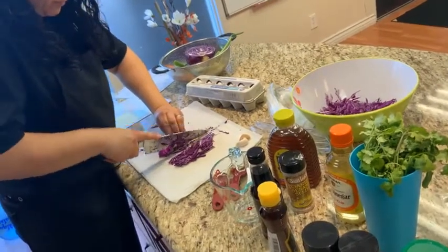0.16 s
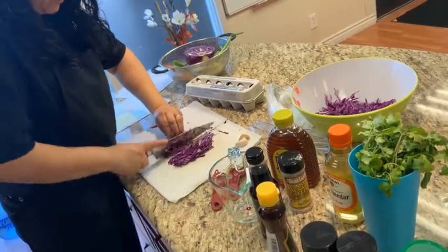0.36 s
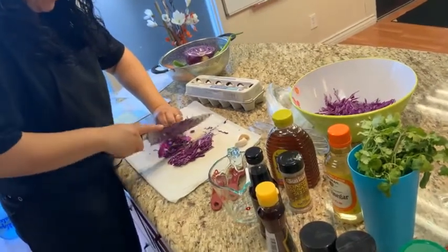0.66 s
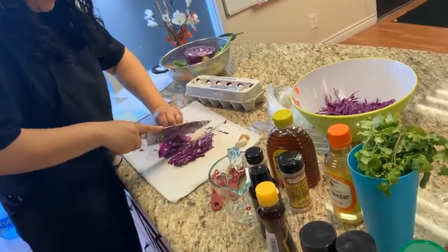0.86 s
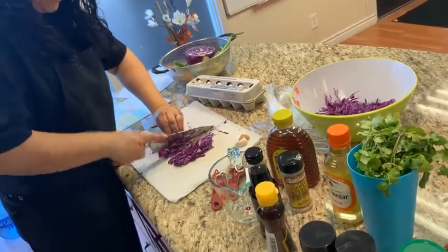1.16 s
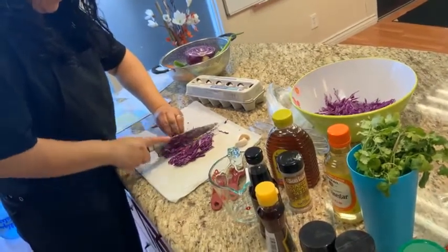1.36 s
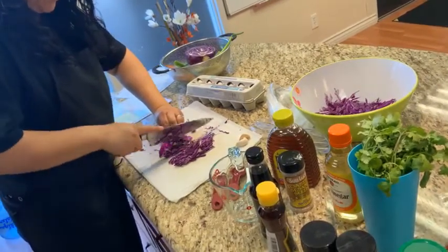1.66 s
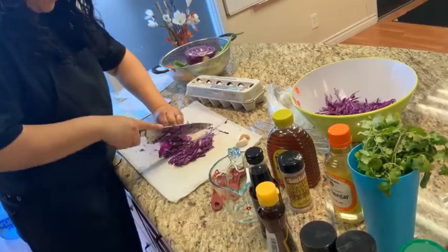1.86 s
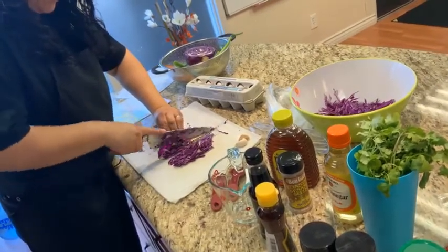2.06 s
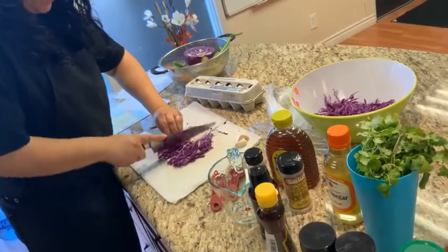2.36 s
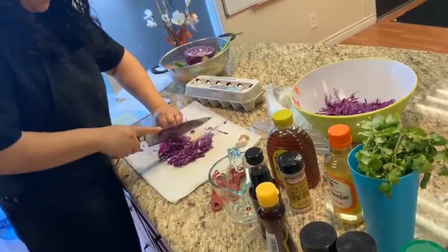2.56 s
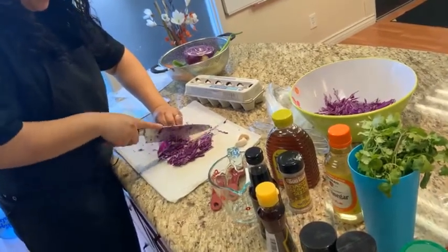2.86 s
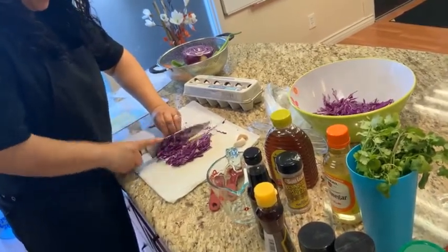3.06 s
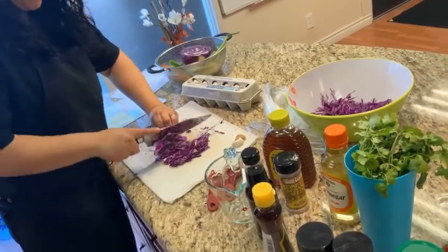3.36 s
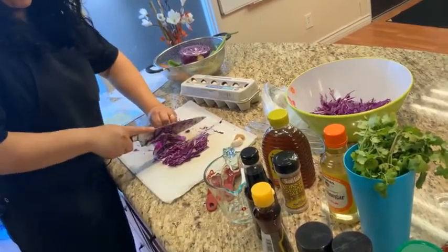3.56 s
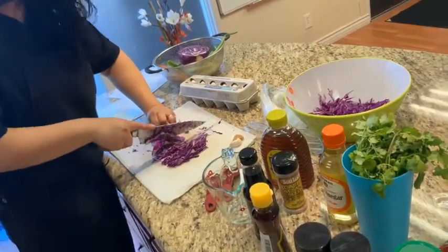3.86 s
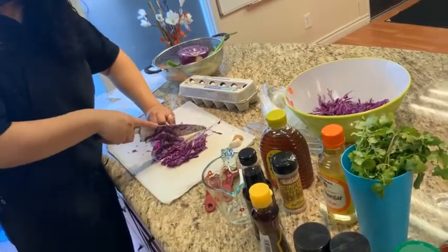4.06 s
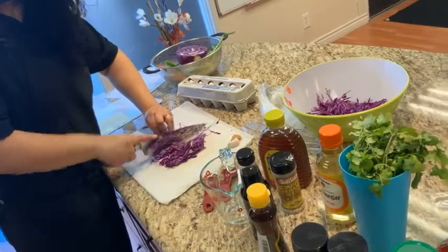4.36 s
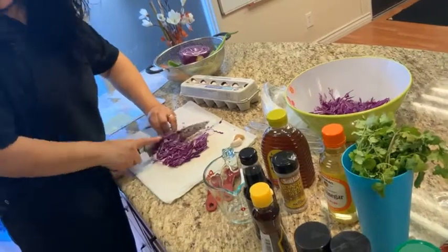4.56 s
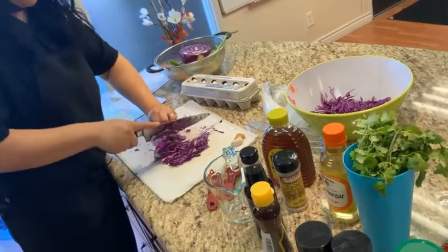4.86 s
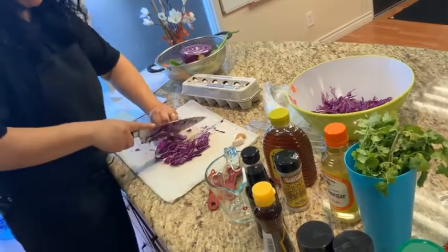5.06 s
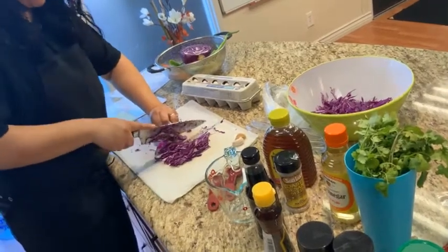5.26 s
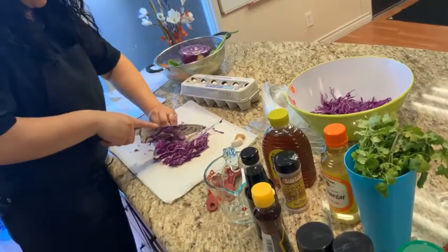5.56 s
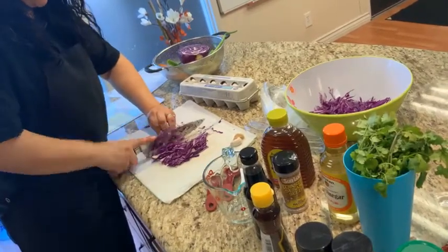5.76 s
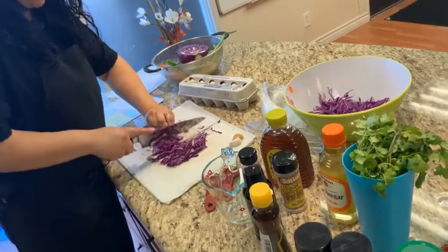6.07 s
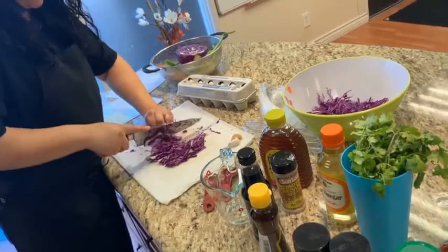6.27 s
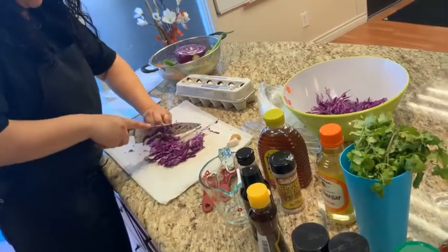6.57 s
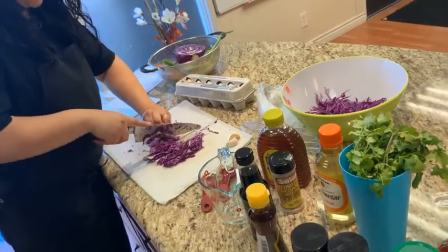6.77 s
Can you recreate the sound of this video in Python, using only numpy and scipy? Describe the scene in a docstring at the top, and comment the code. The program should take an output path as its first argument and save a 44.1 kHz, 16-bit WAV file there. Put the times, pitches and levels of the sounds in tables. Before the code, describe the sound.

A knife slices cabbage on a plastic board in six crisp, crunching strokes with light knocks, over a low appliance hum.

```python
"""A crisp crunch comes first: a chef's knife shreds red cabbage on a plastic board, about a metre away.
In each of six strokes the tip slips through the outer leaves and meets the board, then the heel crushes
the packed layers in a swarm of tiny fractures. Leaves snap, the board knocks, the steel ticks and scuffs.
Shreds rustle between strokes, and an appliance hums in the small, reverberant kitchen."""
import sys
import numpy as np
from scipy import signal
from scipy.fft import rfft, irfft
from scipy.io import wavfile
from scipy.ndimage import uniform_filter1d

SR = 44100
rng = np.random.default_rng(int(sys.argv[2]) if len(sys.argv) > 2 else 0)


def bounce(signal):
    """Save signal as a 16-bit WAV file at the path given by the first command-line argument."""
    frames = np.transpose(np.atleast_2d(signal))
    limited = np.clip(frames, -1, 1)
    pcm = np.round(limited * 32767).astype(np.int16)
    wavfile.write(sys.argv[1], SR, pcm)


N = 305172
TIME = np.arange(N) / SR

# Knife strokes. Each row: start, tip rise and tip hold in seconds, relative tip and glide levels in dB,
# heel delay, rise and hold in seconds, relative heel level in dB, ribs against cells in dB.
KNIFE_STROKES = [(0.025, 0.0025, 0.087, -50, -60, 0.22, 0.086, 0.028, -49, -0.5),
                 (1.024, 0.0025, 0.045, -49, -54.5, 0.17, 0.067, 0.048, -46.5, -2),
                 (1.959, 0.018, 0.017, -46.5, -60, 0.15, 0.038, 0.078, -46, -3.5),
                 (2.883, 0.0059, 0.043, -48.5, -51.5, .135, .045, 0.065, -45, -3),
                 (4.126, .004, 0.016, -51.5, -57.5, .232, 0.092, 0.063, -45, -4.5),
                 (5.558, 0.0088, 0.048, -53, -64, 0.15, 0.028, 0.074, -43, -6)]
# Leaves snapping. Each row: start in seconds, level in dB, low body against the crack in dB.
LEAF_SNAPS = [(0.018, -46.5, -10), (.046, -42.5, -11), (.084, -42, -9), (.173, -43, 2), (.243, -39.5, -20),
              (.731, -50.5, -12), (0.786, -57.5, -16), (.85, -57.5, -20), (1.021, -48, -22),
              (1.055, -40, -15), (1.163, -40, -5), (1.219, -40.5, -5), (1.768, -57, -22),
              (1.974, -38.5, -4), (2.028, -45, -12), (2.103, -43, -4.5), (2.886, -52, -16),
              (3.002, -40.5, -5.5), (3.03, -41, -18), (3.509, -59, -19), (4.126, -52, -25),
              (4.281, -43, -4.5), (4.324, -37, -6), (4.339, -38, -9), (4.412, -46, -3), (5.559, -44.5, -12),
              (5.607, -53, -22), (5.712, -37.5, -22), (6.523, -57, -19), (6.594, -58.5, -16),
              (6.8, -61, -5)]
# Knocks of the edge on the board, and dry taps of the blade. Each row: start in seconds, level in dB.
BOARD_KNOCKS = [(.110, -45), (.266, -47.5), (.375, -50.5), (1.057, -41), (1.239, -50.5), (1.977, -41),
                (2.186, -53), (2.931, -44.5), (3.075, -56), (4.139, -45.5), (5.562, -49), (5.796, -49)]
BLADE_TICKS = [(1.863, -48.5), (3.995, -48), (4.023, -40.5), (4.03, -49), (5.681, -38.5)]
# The edge drawn back over the board, and shreds shifting under the fingers and the lifted blade.
# Each row: time of the peak in seconds, relative level in dB, half width in seconds.
EDGE_SCUFFS = [(4.053, -59, .008), (4.675, -62, 0.021), (5.995, -62, 0.0091)]
SHRED_RUSTLES = [(0.37, -67.5, 0.044), (0.934, -64.5, 0.1), (1.652, -65, .01), (1.875, -64.5, 0.06),
                 (2.586, -61, 0.0075), (2.797, -62.5, 0.048), (3.514, -63.5, 0.012), (3.79, -74, 0.079),
                 (4.016, -60, 0.045), (4.665, -72, 0.072), (5.421, -54, 0.021), (5.534, -60.5, 0.065),
                 (5.967, -66, 0.029), (6.227, -67, .017), (6.533, -61, 0.024), (6.61, -70, 0.093)]
# Modes of the board. Each row: frequency in Hz, relative level in dB, time to fall 60 dB in seconds.
BOARD_RESONANCES = [(730, -12, 0.025), (1015, -5.5, 0.02), (1264, -3.5, 0.022), (1543, 0, 0.021),
                    (1770, -1.5, 0.0082), (1980, 1, 0.012), (2170, -11, 0.024), (2780, 0, 0.016),
                    (3500, -4, 0.0088)]
# Spectra of bursting cells, tearing ribs, the steel blade, loose shreds, fan rumble and rushing air.
# Each row: frequency in Hz, spectral level in dB.
CELL_SPECTRUM = [(1500, -16.5), (4000, -5), (6300, -4.5), (8000, 2.5), (9600, 5), (10600, 3), (11800, 5),
                 (13600, 5), (15300, 9), (16500, 0.5)]
RIB_SPECTRUM = [(120, -27), (330, 5.5), (800, -1), (1300, 1), (1700, 2.5), (2300, -0.5), (3500, 1),
                (5000, 0.5), (6800, 0.5), (9000, -3), (16000, -6.5)]
BLADE_SPECTRUM = [(1500, -34), (2900, -8.5), (4200, -20), (5700, -11), (6600, 0), (8300, -4), (9900, 4.5),
                  (11000, -1), (12500, -9), (14700, 3), (16000, -24)]
SHRED_SPECTRUM = [(500, -1), (2000, -12.5), (4500, -11.5), (6500, -8.5), (8000, -3.5), (9500, 0),
                  (10700, -3.5), (13500, -2), (15200, 0), (16500, 0)]
RUMBLE_SPECTRUM = [(20, -96), (36, -89.5), (55, -70.5), (80, -66), (100, -70), (125, -66.5), (165, -76.5),
                   (200, -80.5), (270, -81), (370, -84.5), (540, -85), (660, -92.5), (1100, -96),
                   (1600, -103)]
AIR_SPECTRUM = [(1600, -103), (2400, -105), (4000, -110), (5100, -113), (5750, -109), (6200, -114),
                (6800, -119), (8300, -122), (9400, -119), (11000, -122), (16000, -120)]
# Motor tones of the appliance. Each row: frequency in Hz, rms level in dB, rms wander in Hz.
MOTOR_TONES = [(78.8, -53.5, 3.93), (96, -51, 2.028), (233.2, -62, 2.55), (416.7, -73, 3.13),
               (493, -68, 1.45), (828, -77.5, 2.97), (956, -77.5, 1.92), (1198, -84.5, 1.88),
               (1316, -72, 1.18), (1803, -84, 2.14), (2440, -84.5, 3.2), (2805, -86.5, 3.2),
               (3400, -85, 3.05), (5680, -103, 30), (5850, -84, 28)]
# Echoes off hard surfaces, counter first. Each row: delay in seconds, level against direct sound in dB.
EARLY_ECHOES = [(.0021, -11.5), (.0039, -19), (.0072, -12.5)]


def slicing(cell_db=0.7, rib_db=0.56, layer_db=0.27, lean_db_per_s=18):
    """Fracture noise follows the cutting force: cells burst, ribs tear, resistance varies by layer."""
    skin_db, skin_s = -8, 0.023  # the thin outer leaves have few ribs
    squeeze_db, squeeze_s = 2, 0.022  # the last layers are crushed against the board
    fizz, crunch = np.zeros(N), np.zeros(N)
    for (start, tip_rise, tip_hold, tip_db, glide_db,
         heel_delay, heel_rise, heel_hold, heel_db, balance_db) in KNIFE_STROKES:
        t = TIME - start
        heel_t = t - heel_delay
        tip = undb(tip_db) * pressure(t, tip_rise, tip_hold)
        glide = undb(glide_db) * pressure(t, tip_rise, heel_delay)
        lean_db = lean_db_per_s * (np.clip(heel_t, 0, heel_hold) - heel_hold / 2)  # the hand bears down
        heel = undb(heel_db + lean_db) * pressure(heel_t, heel_rise, heel_hold) * (t > 0)
        effort = np.maximum(np.maximum(tip, glide), heel)
        entry_db = skin_db * np.exp(-np.maximum(t, 0) / skin_s)
        exit_db = squeeze_db * np.exp(np.minimum(heel_t - heel_hold, 0) / squeeze_s)
        fizz += effort
        crunch += effort * undb(balance_db + entry_db + exit_db)
    layers = unit_rms(undb(layer_db * drift(170)))
    cells = colour(fractures(N, per_second=7600, spread_db=4), CELL_SPECTRUM)
    ribs = colour(fractures(N, per_second=2600, spread_db=3), RIB_SPECTRUM)
    return layers * (undb(cell_db) * fizz * cells + undb(rib_db) * crunch * ribs)


def pressure(t, rise_s, hold_s, release_s=0.014):
    """Force on the edge grows exponentially until t = 0, holds, and relaxes once the edge is through."""
    return np.exp(np.minimum(t, 0) / rise_s - np.maximum(t - hold_s, 0) / release_s)


def snapping(rise_s=0.0003, fade_s=0.0036):
    """Crack propagation: an avalanche of fractures crosses a leaf and dies within milliseconds."""
    out, t = np.zeros(N), TIME[:SR // 16]
    envelope = (1 - np.exp(-t / rise_s)) * np.exp(-t / fade_s)
    for start, db, body_db in LEAF_SNAPS:
        crack = envelope * fractures(len(t), per_second=9000, spread_db=2.5)
        snap = colour(crack, CELL_SPECTRUM) + undb(body_db) * colour(crack, RIB_SPECTRUM)
        add(out, start, at_level(snap, db))
    return out


def knocking(cushion_hz=2500):
    """Impact excites the board's modes; leaves under the edge cushion the blow, a low-pass filter."""
    out = np.zeros(N)
    cushion = signal.butter(3, cushion_hz, fs=SR, output="sos")
    for start, db in BOARD_KNOCKS:
        strike = impact(chatter=0.025, fade_s=0.01)
        knock = signal.fftconvolve(strike, board_response(scatter_db=0, detune=0.058))
        add(out, start, at_level(signal.sosfilt(cushion, knock), db))
    return out


def ticking():
    """Damping by the hand cuts the steel's bright resonances short, leaving a dry tick."""
    out = np.zeros(N)
    for start, db in BLADE_TICKS:
        tick = colour(impact(chatter=0.11, fade_s=0.0042), BLADE_SPECTRUM)
        add(out, start, at_level(tick, db))
    return out


def impact(chatter, fade_s):
    """A hard contact is an impulse followed by decaying chatter."""
    t = TIME[:SR // 25]
    return (t == 0) + chatter * rng.standard_normal(len(t)) * np.exp(-t / fade_s)


def board_response(scatter_db, detune):
    """Free vibration is a sum of damped modes, here scattered at random in level and frequency."""
    t = TIME[:SR // 8]
    out = np.zeros(len(t))
    for hz, db, t60 in BOARD_RESONANCES:
        weakening, mistuning = rng.standard_normal(2)
        mode = np.cos(2 * np.pi * hz * (1 + detune * mistuning) * t)
        out += undb(db - scatter_db * weakening) * mode * decay(t, t60)
    return out


def scuffing():
    """Stick-slip friction: tiny slips of the edge drive the board's modes."""
    slips = fractures(N, per_second=2000, spread_db=5)
    scrape = signal.fftconvolve(slips, board_response(scatter_db=3, detune=0.04))[:N]
    return swells(EDGE_SCUFFS) * unit_rms(scrape)


def rustling(swell_db=0.5, resting_db=-86, fidget_db=4):
    """Friction between wet shreds makes a fine crackle; the holding hand is never quite still."""
    motion = undb(swell_db) * swells(SHRED_RUSTLES) + undb(resting_db + fidget_db * drift(7))
    return motion * colour(fractures(N, per_second=1600, spread_db=3), SHRED_SPECTRUM)


def kitchen(x, tail_db=-12.5, low_t60_s=0.61, treble_t60_s=0.36, split_hz=6000, build_s=0.0018):
    """Reverberation: early reflections lead into a diffuse tail whose treble is absorbed first."""
    t = TIME[:SR * 3 // 5]
    noise = rng.standard_normal(len(t))
    low = signal.sosfilt(signal.butter(2, split_hz, fs=SR, output="sos"), noise)
    treble = signal.sosfilt(signal.butter(2, split_hz, "high", fs=SR, output="sos"), noise)
    tail = low * decay(t, low_t60_s) - treble * decay(t, treble_t60_s)
    tail *= 1 - np.exp(-t / build_s)
    response = undb(tail_db) * unit_energy(tail)
    response[0] += 1  # direct sound
    for delay, db in EARLY_ECHOES:
        smear = rng.standard_normal(48) * np.hanning(48)  # clutter scatters each echo
        add(response, delay, undb(db) * unit_energy(smear))
    return signal.fftconvolve(x, unit_energy(response))[:N]


def appliance(flutter_db=1.53, throb_db=2, throb_corner_hz=250):
    """A fan's broadband rush underlies motor tones; amplitude modulation makes the low ones throb most."""
    spectrum = spectral_gains(RUMBLE_SPECTRUM + AIR_SPECTRUM, N)
    rush = irfft(rfft(rng.standard_normal(N)) * spectrum, N) * np.sqrt(SR / 2)
    out = rush * undb(flutter_db * drift(6))
    for hz, db, wander_hz in MOTOR_TONES:
        phase = 2 * np.pi * np.cumsum(hz + wander_hz * drift(14)) / SR
        depth_db = throb_db * min(1, np.sqrt(throb_corner_hz / hz))
        throb = unit_rms(undb(depth_db * drift(12)))
        out += np.sqrt(2) * undb(db) * throb * np.sin(phase)
    return out


def fractures(size, per_second, spread_db):
    """A Poisson process of clicks, many small and a few large, with an rms of 1."""
    happens = rng.random(size) < per_second / SR
    strength = undb(spread_db * np.minimum(rng.exponential(size=size), 4))
    polarity = np.sign(rng.standard_normal(size))
    return unit_rms(happens * strength * polarity + 1e-9)


def swells(rows):
    """Gaussian pulses sum to a smooth envelope of motion."""
    return sum(undb(db) * np.exp(-0.5 * ((TIME - peak) / width) ** 2) for peak, db, width in rows)


def drift(rate_hz):
    """Smoothing random steps gives a slow fluctuation with an rms of 1."""
    hold = int(SR / rate_hz)
    steps = np.repeat(rng.standard_normal(N // hold + 1), hold)
    return unit_rms(uniform_filter1d(uniform_filter1d(steps, hold), hold)[:N])


def colour(x, spectrum, size=1024):
    """A minimum-phase filter of unit energy imposes a spectrum without ringing ahead of the sound."""
    cepstrum = irfft(np.log(spectral_gains(spectrum, size)))
    cepstrum[1:size // 2] *= 2
    cepstrum[size // 2 + 1:] = 0
    response = irfft(np.exp(rfft(cepstrum)))
    return signal.fftconvolve(x, unit_energy(response))[:len(x)]


def spectral_gains(spectrum, size):
    """Interpolation in log frequency gives the gain at each bin of a transform."""
    hz, db = np.transpose(spectrum)
    bin_hz = np.fft.rfftfreq(size, 1 / SR)
    return undb(np.interp(np.log(bin_hz + 1), np.log(hz), db))


def decay(t, t60):
    """Exponential damping loses 60 dB in t60 seconds."""
    return np.exp(-np.log(1000) * t / t60)


def at_level(x, db):
    """Equal energy: scale a transient to match 5 ms of steady sound at this level."""
    return unit_energy(x) * undb(db) * np.sqrt(0.005 * SR)


def undb(db):
    """Amplitude grows tenfold for every 20 dB."""
    return 10 ** (np.asarray(db) / 20)


def unit_rms(x):
    """Normalise the mean power to 1."""
    return x / np.sqrt(np.mean(x ** 2))


def unit_energy(x):
    """Normalise the sum of squares to 1."""
    return x / np.linalg.norm(x)


def add(track, start_s, x):
    """Superpose a sound on the track."""
    i = int(start_s * SR)
    track[i:i + len(x)] += x[:max(N - i, 0)]


def scene():
    """Superposition: the knife work in the room adds to the hum, the same in both channels."""
    knife_work = slicing() + snapping() + knocking() + ticking() + scuffing() + rustling()
    mono = kitchen(knife_work) + appliance()
    return np.array([mono, mono])


def record(dry):
    """Band limiting: a steep low-pass filter removes the treble above 15.8 kHz."""
    return signal.sosfilt(signal.ellip(12, 0.1, 70, 15800, fs=SR, output="sos"), dry)


dry = scene()
out = record(dry)
bounce(out)
```